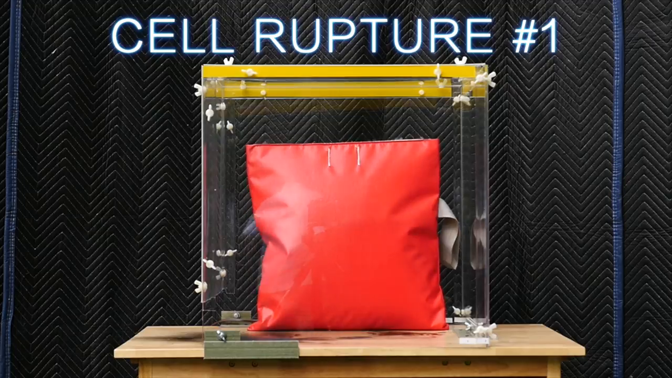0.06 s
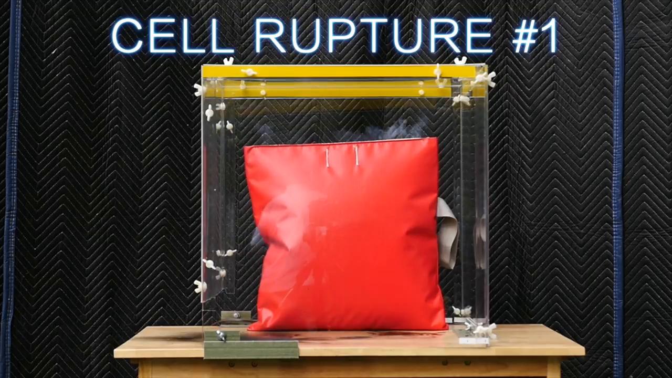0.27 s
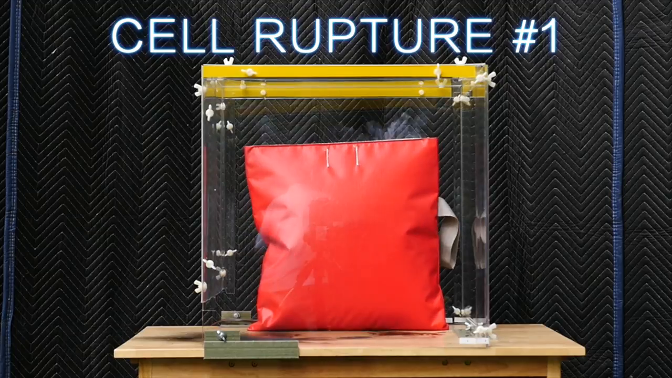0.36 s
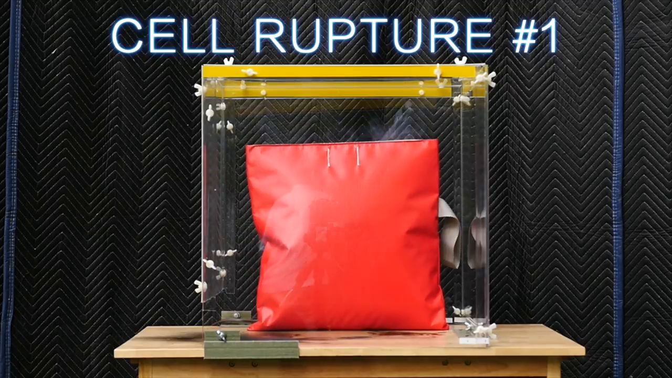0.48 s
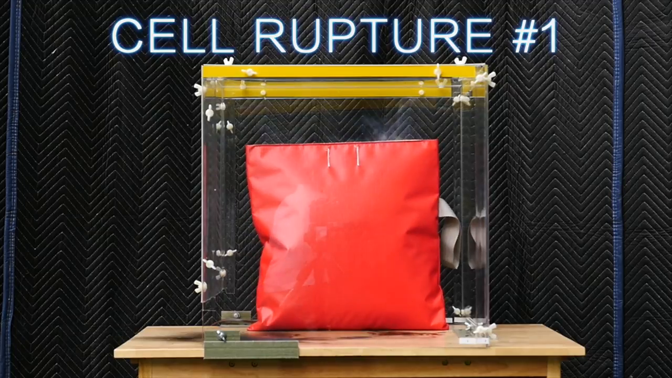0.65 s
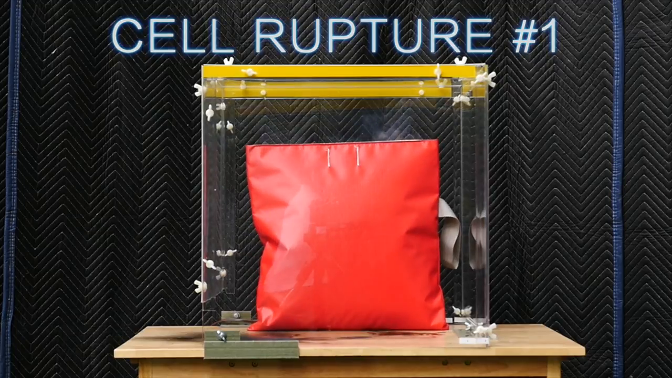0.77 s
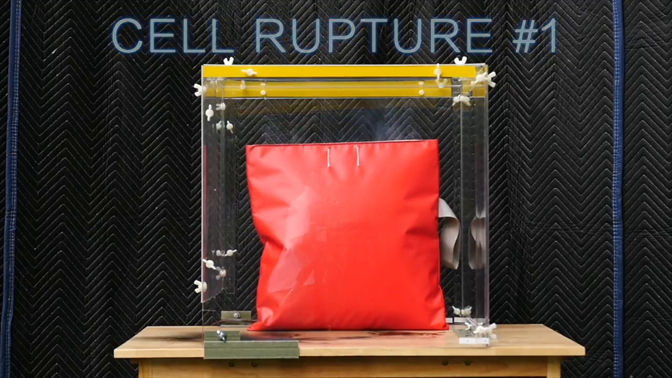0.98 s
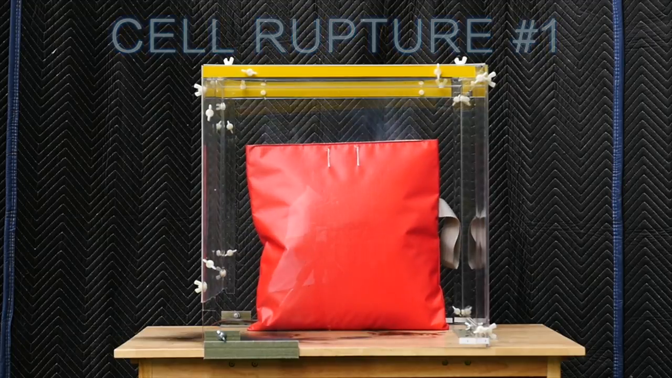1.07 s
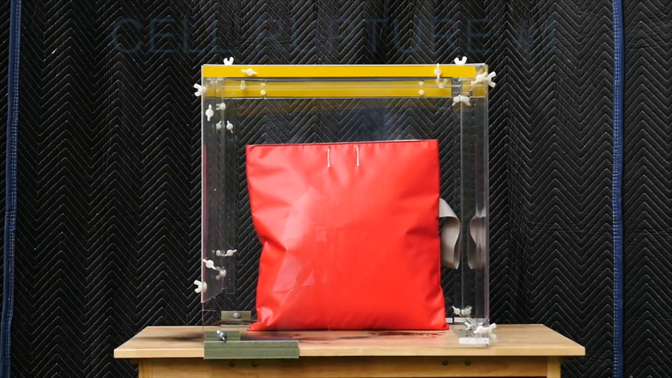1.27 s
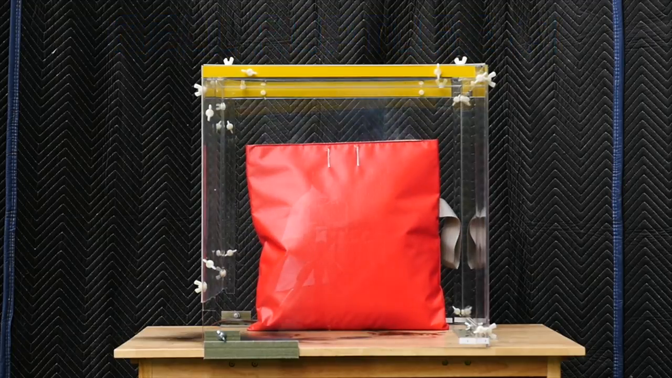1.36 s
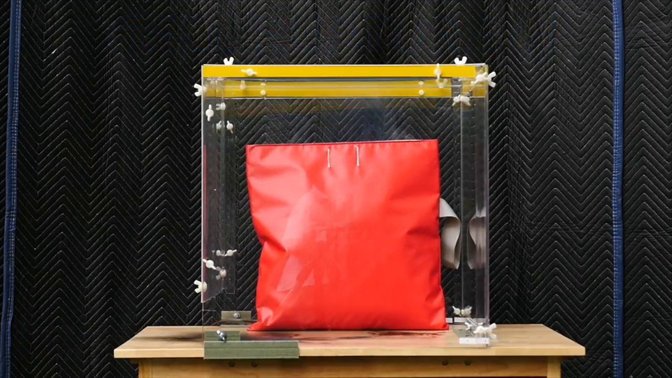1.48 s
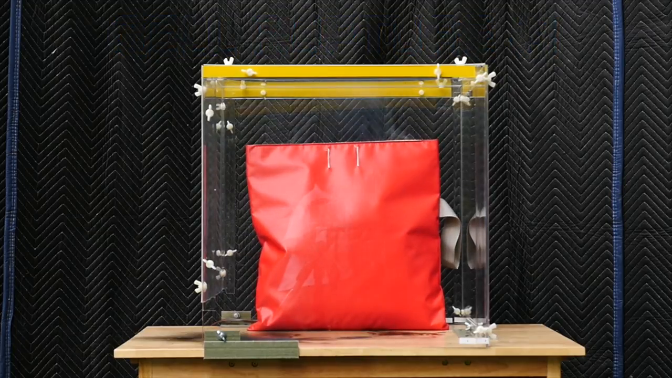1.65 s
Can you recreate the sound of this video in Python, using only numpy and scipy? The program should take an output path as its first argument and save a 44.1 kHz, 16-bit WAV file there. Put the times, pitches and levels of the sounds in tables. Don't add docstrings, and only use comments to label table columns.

```python
import sys
import numpy as np
from scipy import signal
from scipy.fft import rfft, irfft, next_fast_len
from scipy.io import wavfile
from scipy.ndimage import map_coordinates

SR = 44100
rng = np.random.default_rng(int(sys.argv[2]) if len(sys.argv) > 2 else 0)


def transcribe(signal):
    frames = np.atleast_2d(signal).T
    limited = np.clip(frames, -1, 1)
    pcm = np.round(limited * 32767).astype(np.int16)
    wavfile.write(sys.argv[1], SR, pcm)


def natural_amplitude(level_db):
    exponent = np.asarray(level_db, float) / 20
    return 10 ** exponent


N = 74970
POP_S = 0.222


def unit(x):
    return x / np.sqrt(np.mean(x ** 2) + 1e-20)


def clock():
    return np.arange(N) / SR


def curve(rows):
    return np.interp(clock(), *np.transpose(rows))


def wobble(rate_hz):
    knots = rng.standard_normal(int(N * rate_hz / SR) + 4)
    return map_coordinates(knots, [np.arange(N) * rate_hz / SR])


def filtered(x, response):
    size = next_fast_len(N + 8192)
    return irfft(rfft(x, size) * response(np.fft.rfftfreq(size, 1 / SR)), size)[:N]


def modes(rows):
    return lambda f: sum(natural_amplitude(db) * 1j * f * w / (hz * hz - f * f + 1j * f * w) for hz, w, db in rows)


def noise(colour):
    hz, db = np.transpose(colour)

    def response(f):
        return natural_amplitude(np.interp(np.log(f + 1), np.log(hz), db, left=-120))

    return unit(filtered(rng.standard_normal(N), response))


def bell(start_s, width_s):
    return 2.0 ** (-(2 * (clock() - start_s) / width_s) ** 2)


def swing(start_s, pitch_hz):
    return np.cos(2 * np.pi * pitch_hz * (clock() - start_s))


def tone(pitch_hz):
    return np.sin(2 * np.pi * np.cumsum(pitch_hz) / SR)


# freq_hz, level_db (per Hz)
ROOM_HISS = [(200, -22), (500, 4), (2000, -21.5), (5000, -31), (9500, -32), (12000, -37), (16500, -51.5)]
# pitch_hz, width_hz, level_db
ROOM_WHINES = [(7850, 330, 3), (8570, 100, 2.5), (9500, 100, 3.5)]


def room():
    room_db, preamp_db, duck_db, recover_s = -47.5, -66.5, -8.5, 0.8
    since = clock() - POP_S - 0.006
    gain_db = duck_db * (since > 0) * np.clip(1 - since / recover_s, 0, 1)
    hiss = noise(ROOM_HISS)
    air = natural_amplitude(room_db) * (hiss + filtered(hiss, modes(ROOM_WHINES)))
    return natural_amplitude(gain_db) * (air + natural_amplitude(preamp_db) * rng.standard_normal(N))


# start_s, level_db (peak), pitch_hz
CLOTH_TICKS = [(0.224, -39.5, 2600), (0.2246, -45, 5000), (.2244, -52.5, 9500), (1.556, -47.5, 3200),
               (.254, -65.5, 7300), (.264, -68.5, 6830), (.326, -55, 4400), (0.367, -46.5, 4260),
               (0.369, -59.5, 6420), (0.42, -59.5, 8300), (1.055, -61.5, 11000), (1.057, -59.5, 8900),
               (0.337, -64.5, 5000)]


def cloth_ticks():
    tick_s, tick_q = 0.0018, 2.5

    def tick(start_s, level_db, pitch_hz):
        burst = natural_amplitude(level_db + 12.0) * bell(start_s, tick_s) * rng.standard_normal(N)
        resonance = modes([(pitch_hz, pitch_hz / tick_q, 0)])
        return filtered(burst, lambda f: resonance(f) ** 2)

    return sum(tick(*row) for row in CLOTH_TICKS)


# start_s, pitch_hz, level_db
LEAK = [
    (1.598, 4870, -78),
    (1.608, 4850, -63),
    (1.62, 4700, -62),
    (1.632, 4050, -55),
    (1.645, 3600, -60),
    (1.66, 3350, -61),
    (1.67, 3300, -80),
]


def leak_squeak():
    start_s, pitch_hz, level_db = np.transpose(LEAK)
    pitch = np.interp(clock(), start_s, pitch_hz)
    level = np.interp(clock(), start_s, level_db, left=-120, right=-120)
    return natural_amplitude(level + 2.5 * wobble(120)) * tone(pitch + 70 * wobble(300))


# start_s, level_db (peak), pitch_hz, width_s
WALL_KNOCKS = [(.058, -28.5, 544.4, 0.032), (.19, -23.5, 458, 0.022), (.205, -12.5, 309, 0.0074),
               (.2135, -7, 265, 0.0083), (.231, -23.5, 230.4, 0.0098), (.237, -23, 620, .018),
               (.25, -23, 331.6, 0.031), (.916, -20, 284, 0.011), (.916, -24.5, 624, 0.022),
               (1.4, -30, 480, 0.0042), (1.405, -25, 300, 0.013), (1.498, -46, 294, 0.0059),
               (1.503, -25, 455, .016)]


def wall_knocks():
    return sum(natural_amplitude(db) * bell(s, w) * swing(s, hz) for s, db, hz, w in WALL_KNOCKS)


# start_s, level_db, width_s
AIR_RINGS = [(0.306, -33.5, 0.02), (0.394, -22, 0.02), (0.44, -21, 0.017), (.5, -30.5, .02),
             (0.55, -26, 0.014), (0.613, -23.5, 0.017), (0.645, -19, 0.0086), (0.71, -17.5, 0.0095),
             (0.791, -20.5, 0.068), (0.909, -16, 0.016), (0.945, -38, 0.0049), (0.969, -19, 0.0062),
             (1.013, -15.5, 0.0076), (1.042, -20, 0.01), (1.075, -16.5, 0.0083), (1.137, -31, 0.0098),
             (1.167, -16, 0.013), (1.215, -17.5, 0.017), (1.29, -17.5, 0.016), (1.335, -26, 0.015),
             (1.405, -19.5, 0.01), (1.499, -19, 0.01), (1.62, -36, 0.02)]


def box_rings():
    rise, fall = 1.14, 2.12
    swell = sum(natural_amplitude(db - 1.5) * bell(s, np.where(clock() < s, rise, fall) * w) for s, db, w in AIR_RINGS)
    return swell * natural_amplitude(0.79 * wobble(60)) * tone(436 + 4.5 * wobble(45))


# start_s, level_db
GAS_FLOW = [(0.0, -55.5), (0.164, -42.5), (.235, -45), (.265, -51.5), (.302, -58), (.335, -46.5),
            (0.42, -48), (.62, -47.5), (0.88, -40), (.93, -39.5), (.97, -41), (1.03, -39.5), (1.11, -42),
            (1.19, -40.5), (1.26, -43.5), (1.34, -39.5), (1.385, -46.5), (1.514, -45.5), (1.7, -47.5)]


def jet_flow():
    return natural_amplitude(curve(GAS_FLOW) + 1.3 * wobble(30) + 1.3 * wobble(150))


# freq_hz, level_db (per Hz)
STIRRING = [(250, -29), (380, -2.5), (520, 10.5), (800, -38.5), (2000, -120)]
# pitch_hz, width_hz, level_db
BOX_MODES = [(429.5, 15, 17), (436.6, 39, 16.5), (456, 21, -22.5)]


def stirred_box(jet):
    from_s, rise_s, level_db = 0.35, 0.03, 9
    swollen = np.clip((clock() - from_s) / rise_s, 0.1, 1)
    return swollen * natural_amplitude(level_db) * jet * unit(filtered(noise(STIRRING), modes(BOX_MODES)))


# start_s (crest), level_db, width_s
GAS_FLARES = [(0.049, -37, 0.087), (0.111, -40.5, 0.078), (0.222, -25, 0.013), (0.284, -39.5, 0.026),
              (0.326, -45, 0.026), (0.364, -41, 0.042), (0.409, -47.5, .04), (0.444, -39, 0.12),
              (.528, -37, 0.093), (0.634, -34, 0.042), (0.67, -33, 0.022), (0.783, -36, 0.049),
              (0.895, -30.5, 0.031), (0.914, -29.5, 0.063), (1.01, -29, 0.061), (1.07, -32.5, 0.035),
              (1.157, -33.5, 0.036), (1.192, -34.5, 0.06), (1.286, -31.5, 0.035), (1.331, -37.5, 0.038),
              (1.401, -29, 0.038), (1.496, -34, 0.025), (1.56, -38.5, 0.019), (1.617, -46.5, 0.023)]
# start_s, level_db, width_s
SPITS = [(.333, -60, 0.016), (.372, -55, 0.015), (.79, -65.5, 0.037), (0.927, -56, 0.078),
         (1.017, -54, 0.046), (1.074, -58.5, 0.022), (1.166, -55, 0.074), (1.207, -59, 0.058),
         (1.337, -57, 0.07), (1.403, -54.5, 0.035), (1.498, -54.5, 0.029)]
# freq_hz, level_db (per Hz)
FLARE_COLOUR = [(180, -0.5), (300, 5), (600, 4.5), (1000, -4), (2800, -36), (5000, -54.5), (9000, -53.5),
                (16000, -63)]
JET_COLOUR = [(180, -12.5), (300, 0.5), (600, -2), (1000, -9.5), (2800, -21.5), (5000, -33.5), (9000, -49),
              (16000, -60.5)]
FIZZ_COLOUR = [(600, -26), (1200, 6.5), (2500, -3), (4500, -20.5), (8000, -34), (16000, -58)]
SPIT_COLOUR = [(2000, -19), (3500, 7.5), (4800, 0), (7000, -9), (9500, -18.5), (16000, -29.5)]
# pitch_hz, width_hz, level_db
WEAVE_WHISTLES = [(586.5, 25, -16.5), (878, 62, -8.5), (1168, 13, 6.5), (1406, 4.7, 4), (1606, 8.4, 5),
                  (1881, 5.8, 9.5), (2290, 10, 0), (2510, 11, 0.5), (2924, 6.5, 10), (3276, 44, 2.5),
                  (4620, 29, -2), (5170, 11, 5), (6960, 120, 5.5), (9440, 90, -1.5)]


def gas_roar(jet):
    def flare(start_s, level_db, width_s):
        shape = np.where(clock() < start_s, bell(start_s, 0.013), bell(start_s, 0.86 * width_s))
        return natural_amplitude(level_db) * shape

    flares = np.sqrt(sum(flare(*row) ** 2 for row in GAS_FLARES))
    roar = natural_amplitude(3.5 + 1.3 * wobble(200)) * flares * noise(FLARE_COLOUR)
    roar = roar + natural_amplitude(6.5) * jet * noise(JET_COLOUR)
    fizz_db = -8 + (curve(GAS_FLOW) + 42)
    roar = roar + natural_amplitude(fizz_db + 0.5 * wobble(300)) * flares * noise(FIZZ_COLOUR)
    spits = sum(natural_amplitude(db) * bell(s, w) for s, db, w in SPITS)
    roar = roar + spits * natural_amplitude(0.98 * wobble(250)) * noise(SPIT_COLOUR)
    return roar + filtered(roar, modes(WEAVE_WHISTLES))


# freq_hz, level_db (per Hz)
POP_COLOUR = [(150, -25), (200, -10), (280, 2), (450, -8), (650, -16), (1200, -32), (3500, -55),
              (9000, -100)]


def pop():
    level_db, rise_s, fall_s = -15, 0.02, 0.024
    since = clock() - POP_S
    return natural_amplitude(level_db) * np.exp(np.where(since < 0, since / rise_s, -since / fall_s)) * noise(POP_COLOUR)


# start_s, level_db (peak), pitch_hz, width_s
BAG_PUFFS = [(.06, -30, 87, .05), (.13, -19.5, 100, 0.015), (.16, -23.5, 110.4, .025),
             (.263, -14, 75, 0.013), (.282, -19, 111, 0.025), (0.3389, 0.8, 74.8, 0.041),
             (0.4133, -6.5, 82, 0.025), (.4395, -6, 83, 0.02), (0.4636, -5.5, 106, 0.0086),
             (0.487, -8.5, 115.8, 0.026), (0.508, -6, 99, 0.015), (.522, -8.5, 114.4, 0.0081),
             (0.5495, -18.5, 98, 0.018), (0.5767, -30, 103, 0.0064), (0.616, -20.5, 116.6, 0.017),
             (0.6575, -3, 108.4, 0.014), (0.6836, -7, 90.4, 0.013), (0.699, -11.5, 98.2, 0.05),
             (0.735, -8, 115, 0.012), (0.7814, -5.5, 119, 0.017), (0.813, -4, 122.7, 0.041),
             (0.8596, -15.5, 109, 0.013), (0.9062, 0.5, 106, 0.016), (0.9222, 0.5, 91, 0.02),
             (.9465, -4, 86, 0.02), (1.0115, -3, 108, 0.021), (1.045, -20.5, 94, 0.092),
             (1.083, -12, 95, 0.0088), (1.1652, -11, 105, 0.016), (1.2027, -9, 89.6, 0.011),
             (1.2207, -12, 96, 0.015), (1.299, -5.5, 117, 0.017), (1.314, -13, 70, 0.024),
             (1.3365, -13.5, 119, 0.042), (1.4078, -6.9, 116, 0.014), (1.423, -18, 129, 0.02),
             (1.5015, -15.5, 103, 0.011), (1.6167, -23, 100, 0.012)]
# start_s, level_db (peak), pitch_hz, width_s
BAG_JOLTS = [
    (.207, 0, 140, .007),
    (.2168, 2.5, 140, .0055),
    (.2248, 5, 125, .006),
    (.2368, -2, 130, .007),
    (.248, -6, 70, .014),
    (.3385, -13, 45, .012),
]
# start_s, level_db (peak), pitch_hz, width_s
BAG_SUCKS = [
    (0.2211, -3, 120, 0.0035),
    (0.2395, -5, 100, .007),
    (0.348, -9.5, 110, 0.007),
    (0.4587, -3.5, 115, 0.0072),
    (.512, -11.5, 105, 0.004),
    (0.9154, -3, 85, 0.0085),
    (0.928, -12, 90, 0.0088),
    (1.296, -14.5, 110, 0.012),
]
# start_s, level_db
BAG_PRESSURE = [(0.0, -32), (0.136, -28.5), (0.212, -12.5), (0.33, -11.5), (0.368, -15.5), (0.86, -14.5),
                (0.946, -11.5), (1.288, -24.5), (1.43, -28.5), (1.556, -31.5), (1.7, -36)]
# freq_hz, level_db (per Hz)
FLUTTER_COLOUR = [(15, -44), (25, -37.5), (65, -2.5), (119, -5), (164, -8.5), (200, -35), (260, -36.5),
                  (340, -47.5), (570, -120)]


def bag():
    pushes = [(natural_amplitude(db) * bell(s, 0.8 * w), swing(s, hz)) for s, db, hz, w in [*BAG_PUFFS, *BAG_JOLTS]]
    pulls = [(natural_amplitude(db) * bell(s, w), -swing(s, hz)) for s, db, hz, w in BAG_SUCKS]
    swings = pushes + pulls
    slack = 1 / (1 + 1.3 * sum(size for size, _ in swings))
    flutter = slack * natural_amplitude(curve(BAG_PRESSURE) - 4.0 + 0.62 * wobble(25)) * noise(FLUTTER_COLOUR)
    return sum(size * wave for size, wave in swings) + flutter


def scene():
    heaving = bag()
    jet = jet_flow()
    gas = gas_roar(jet)
    box = stirred_box(jet) + wall_knocks() + box_rings()
    burst = pop()
    background = cloth_ticks() + leak_squeak() + room()
    return (heaving + gas + box + burst + background)[None]


def roll_off(x):
    return signal.sosfilt(signal.butter(12, 15800, fs=SR, output="sos"), x)


def record(dry):
    top = 1.015
    return roll_off(np.clip(dry, -top, top))


dry = scene()
out = record(dry)
transcribe(out)
```